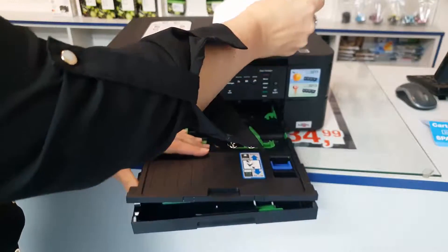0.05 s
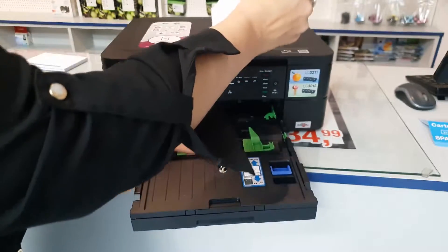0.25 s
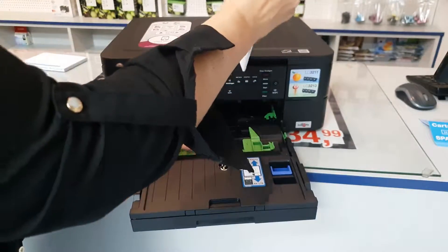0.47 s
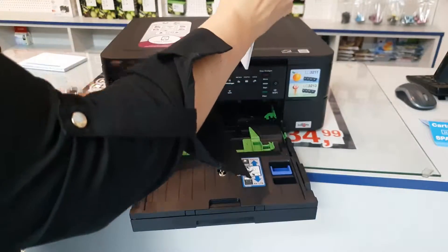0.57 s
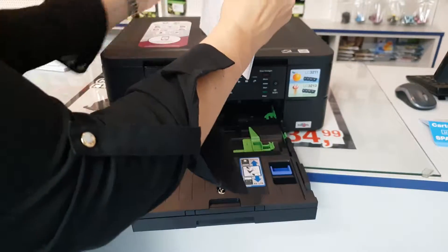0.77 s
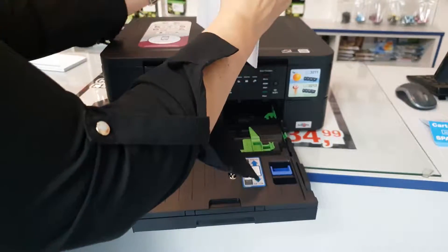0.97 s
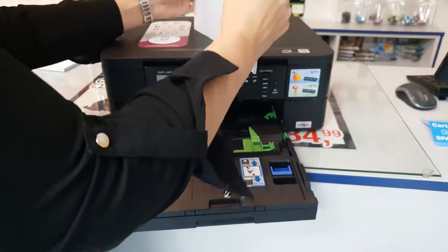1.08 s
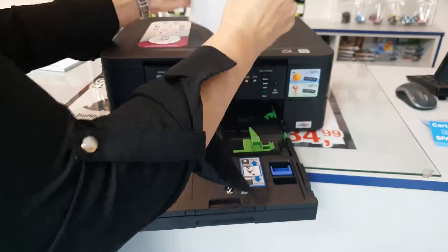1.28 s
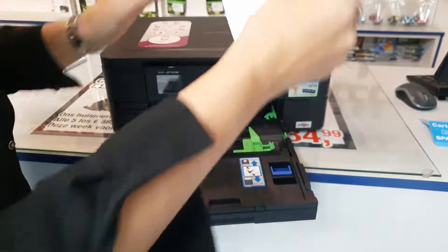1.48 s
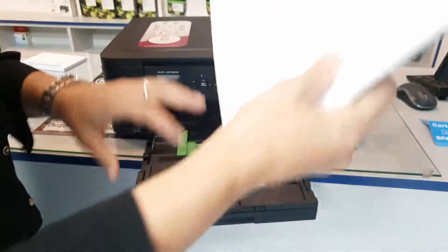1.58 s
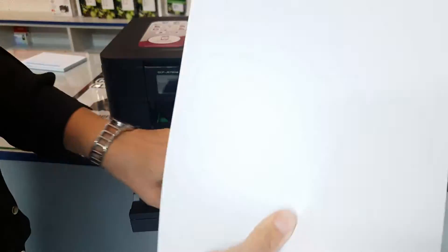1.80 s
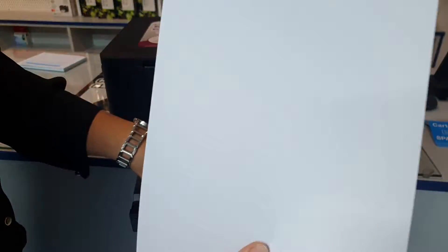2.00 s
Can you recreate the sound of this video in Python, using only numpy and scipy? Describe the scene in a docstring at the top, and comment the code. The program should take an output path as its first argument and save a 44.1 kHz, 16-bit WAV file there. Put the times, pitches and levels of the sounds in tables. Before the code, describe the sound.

A printer's plastic paper tray slides briefly, and its lid clacks shut sharply at about 0.25 seconds. Two hollow knocks on the housing follow near 0.8 and 1.1 seconds, the second louder, with small rattles and light paper crackling. A hand scuffs the casing around 1.4 seconds, and the sheet swishes softly from 1.3 to 1.9. The tray squeaks faintly near 2 seconds. Soft ventilation rumbles throughout.

```python
"""Over a shop's soft ventilation rumble, a printer's paper tray slides with a rush of friction, and its
plastic lid clacks shut in a cluster of impacts that excite its modes and shake the counter. Two hollow
knocks on the housing follow, with small rattles, while a sheet of paper crackles as it flexes. The
sheet swishes through the air, a hand scuffs the housing, and last the tray squeaks faintly by stick-slip."""
import sys
import numpy as np
from scipy import signal
from scipy.fft import rfft, irfft
from scipy.io import wavfile
from scipy.ndimage import uniform_filter1d

SR = 44100
rng = np.random.default_rng(int(sys.argv[2]) if len(sys.argv) > 2 else 0)


def to_wav(s):
    """Save 16-bit WAV."""
    ch = np.atleast_2d(s).T  # columns
    pcm = np.round(np.clip(ch, -1, 1) * 32767)  # PCM
    wavfile.write(sys.argv[1], SR, pcm.astype(np.int16))


N = 90404
TIME = np.arange(N) / SR
TAPS = 4096
HZ = abs(np.fft.fftfreq(TAPS, 1 / SR)) + 1  # frequency grid of the filters

# Levels in the tables are relative; spectra give the level per unit bandwidth.
# reverberation of the shop (frequency [Hz], T60 [s])
ROOM_DECAY = [(100, 0.72), (250, 0.48), (800, 0.33), (2000, 0.35), (4500, .4), (9000, 0.34), (15000, .3)]
ROOM_BUILD_S, ROOM_COHERENCE, MONO_BELOW_HZ = 0.013, 0.26, 560
# ventilation spectrum (frequency [Hz], level [dB])
VENT_SPECTRUM = [(20, -23.5), (38, -9.5), (62, 9), (85, 3), (115, 0.5), (160, -12), (260, -13), (400, -22),
                 (800, -31.5), (1600, -38.5), (4000, -27.5), (8000, -39.5), (15000, -37)]
# pushes of the tray (peak time [s], level [dB], rise [s], fall [s], bass edge [Hz])
SLIDE_STROKES = [(.0, -51, 0.044, 0.044, 119.2), (.165, -57.5, .03, .03, 1800),
                 (0.211, -42.5, 0.018, 0.013, 497)]
# friction spectrum of the runners (frequency [Hz], level [dB])
SLIDE_SPECTRUM = [(100, -15), (240, 14.5), (400, 1), (850, -0.5), (1500, -4), (4000, -1.5), (6500, -13.5),
                  (9000, -13), (15000, -22.5)]
SLIPS_PER_S, SLIP_SPREAD_DB, RUB_LAG_S = 9000, 3, 0.00036
# flexes of the sheet (peak time [s], level [dB], rise [s], fall [s], treble edge [Hz])
RUSTLE_STROKES = [(.15, -64, 0.031, 0.017, 11000), (.6, -66, 0.027, 0.026, 4600),
                  (0.767, -61, 0.0026, 0.03, 2600), (.77, -68.5, .005, 0.062, 11000),
                  (0.919, -54, 0.0067, 0.022, 16000), (.97, -80, 0.017, 0.082, 14000),
                  (1.19, -58, 0.136, 0.022, 14200), (1.35, -62.5, 0.034, 0.031, 16000),
                  (1.877, -64, .006, 0.022, 14000), (1.973, -63, 0.082, 0.052, 11000)]
# crackle spectrum of paper (frequency [Hz], level [dB])
RUSTLE_SPECTRUM = [(500, -18.5), (2300, -11), (4500, 1), (7000, -5), (9500, 1), (12000, -3.5), (15000, -3)]
# impacts of the lid on the tray (time [s], level [dB], tilt [dB/octave])
LID_IMPACTS = [(0.21, -24.5, 5), (0.223, -9, 2.5), (0.2266, -4.5, 2.5), (0.2376, -2, 0.5),
               (0.2403, -3.5, -1.5), (0.2451, -7, 3.5), (.2505, -8.5, -2.5), (0.2568, -9.5, -0.5),
               (0.2689, -18.5, 3), (.281, -15.5, 0), (.315, -21.5, -1.5)]
# spectrum of the tray's dense ring (frequency [Hz], level [dB])
TRAY_SPECTRUM = [(60, -32), (170, -21.5), (300, -8), (520, -2), (700, 1.5), (960, 3.5), (1400, 1.5),
                 (2400, 0), (4100, 0), (6000, -7.5), (9500, -10), (15000, -20.5)]
# distinct modes of the tray (frequency [Hz], level [dB])
TRAY_RESONANCES = [(195, -12), (246, -8), (492, -3), (547, 3), (861, 3), (921, 4), (964, 1), (1187, 0),
                   (1573, 0), (2228, -1), (2416, 3), (2960, 1), (3250, -1), (4154, -2), (4272, 0),
                   (4895, -5), (7648, -7)]
TRAY_DENSE_DB, TRAY_MODES_DB, TRAY_MODE_T60_S = 15.5, -44, 0.24
MODE_RISE_S, MODE_SPREAD_RAD_PER_HZ = 0.0012, 0.00061
# shudders of the counter (peak time [s], level [dB], rise [s], fall [s])
COUNTER_SHUDDERS = [(.275, -47.5, 0.0086, .06), (1.085, -47, 0.015, 0.081)]
# spectrum of the counter (frequency [Hz], level [dB])
COUNTER_SPECTRUM = [(25, -24.5), (60, -3), (90, -0.5), (150, 0), (220, -9.5), (500, -36), (2000, -72.5)]
# knocks and rattles (time [s], level [dB], treble edge [Hz], bass edge [Hz], mode level [dB])
HOUSING_IMPACTS = [(.7625, -5, 1850, 1900, -3), (.7675, -13, 1100, 220, -3), (.776, -11, 1250, 400, -12),
                   (.788, -13, 400, 200, -10), (.907, -9, 680, 620, -30), (1.061, -14, 5500, 1200, -25),
                   (1.0635, 4, 750, 380, 1), (1.068, -1, 14000, 240, -3), (1.0775, -1, 11000, 220, -1),
                   (1.092, -7, 1200, 200, -6), (1.122, -12, 3800, 250, -9), (1.143, -5, 2000, 650, -25),
                   (1.152, -4, 1800, 650, -25), (1.281, -17, 2600, 2600, -35), (1.4, -20, 1500, 900, -35),
                   (1.434, -27, 1400, 700, -35)]
# spectrum of the housing's dense ring (frequency [Hz], level [dB])
HOUSING_SPECTRUM = [(60, -8), (165, -15), (240, -2.5), (380, -8.5), (600, -6), (900, -7), (1700, -13),
                    (2800, -11), (5000, -19.5), (8000, -31), (15000, -28.5)]
# hollow modes of the housing (frequency [Hz], level [dB], T60 [s])
HOUSING_RESONANCES = [(196.8, -10.5, 0.37), (231, -7.5, 0.16), (245.1, 4, 0.25), (298.7, -8.5, 0.28),
                      (331.5, -23, 0.56), (462.7, -15, 0.453), (532, -20, 0.17), (580, -8.5, 0.098),
                      (599, -12.5, 0.21), (837, -9, 0.15), (1170, -6.5, 0.13), (1463, -15.5, 0.088),
                      (1585, -16.5, 0.17), (1761, -12, 0.19), (2093, -24, 0.053)]
HOUSING_DENSE_DB, HOUSING_MODES_DB, TREBLE_FLOOR_DB = 14.5, -32, -30
# swings of the sheet (peak time [s], level [dB], rise [s], fall [s])
SWISH_STROKES = [(1.29, -59.5, 0.065, 0.091), (1.64, -56.5, 0.079, 0.08), (1.79, -67.5, .04, .06),
                 (1.89, -68, 0.013, 0.13)]
# spectrum of the swinging sheet (frequency [Hz], level [dB])
SWISH_SPECTRUM = [(200, -7.5), (900, 2), (1400, -2.5), (2200, 1.5), (3300, 0), (5000, -4), (7000, -9),
                  (8700, -7.5), (12000, -15.5), (15000, -24)]
# strokes of a hand on the housing (peak time [s], level [dB], rise [s], fall [s])
SCUFF_STROKES = [(1.375, -50, 0.031, 0.047), (1.44, -60, 0.022, 0.054)]
# friction spectrum of the hand (frequency [Hz], level [dB])
SCUFF_SPECTRUM = [(120, -10), (420, 3), (850, 2), (1400, -4), (2500, -17.5), (6000, -45.5), (15000, -35)]
# squeaks of the tray (peak time [s], level [dB], rise and fall [s], pitch [Hz])
SQUEAK_TONES = [(1.963, -65, .02, 790), (2.018, -66, .018, 750), (2.015, -69, .014, 600)]
# harmonics of a squeak, from the fundamental up (level [dB])
SQUEAK_HARMONICS = [0, -20, -12]
SQUEAK_JITTER = 0.045  # RMS fraction of the pitch


def amp(db):
    """Amplitude ratio of a level in decibels."""
    return 10 ** (np.asarray(db) / 20)


def unit(x):
    """Normalisation to unit RMS."""
    return x / np.sqrt(np.mean(x ** 2) + 1e-20)


def curve(points, hz):
    """Interpolation on a log-frequency axis."""
    freqs, values = np.transpose(points)
    return np.interp(np.log(hz + 1), np.log(freqs + 1), values)


def add(mix, start_s, sound):
    """Superposition of a sound on the mix."""
    part = mix[:, round(start_s * SR):][:, :sound.shape[1]]
    part += sound[:, :part.shape[1]]


def rolloff_db(ratio, order):
    """Butterworth response: 3 dB down at a frequency ratio of 1, falling beyond it."""
    return -10 * np.log10(1 + ratio ** (2 * order))


def colour(x, gain_db):
    """Minimum-phase filtering, with the gain given on the grid HZ."""
    log_gain = np.log(amp(np.maximum(gain_db, -100)))
    taps = np.fft.ifft(np.exp(np.conj(signal.hilbert(log_gain)))).real
    return signal.fftconvolve(x, taps[None, :TAPS // 2], axes=1)[:, :x.shape[1]]


def stereo(x, coherence, lag_s=0):
    """Partial coherence: two independent noises blend into left and right, nearly mono in the bass."""
    hz = np.fft.rfftfreq(x.shape[1], 1 / SR)
    shared = np.clip(coherence + (1 - coherence) / (1 + (hz / MONO_BELOW_HZ) ** 3), 0, 1)
    mid, side = rfft(x) * np.sqrt([(1 + shared) / 2, (1 - shared) / 2])
    left = (mid + side) * np.exp(-2j * np.pi * hz * lag_s)
    return irfft(np.array([left, mid - side]), x.shape[1])


def room(x, wet_db):
    """Reverberation: a diffuse tail builds up and decays exponentially, the bass lasting longest."""
    noise = stereo(rng.standard_normal((2, SR)), ROOM_COHERENCE)
    hz, t, bands = signal.stft(noise, SR, nperseg=256)
    decay = 1000. ** (-t / curve(ROOM_DECAY, hz)[:, None])
    tail = signal.istft(bands * decay, SR, nperseg=256)[1][:, :SR]
    tail *= 1 - np.exp(-(TIME[:SR] / ROOM_BUILD_S) ** 2)
    return x + amp(wet_db) * signal.fftconvolve(x[:1], tail / np.linalg.norm(tail[0]), axes=1)[:, :N]


def swell(peak_s, db, rise_s, fall_s):
    """Envelope of a stroke: a Gaussian rise, then a nearly exponential decay."""
    t = TIME - peak_s
    rise = -(t / rise_s) ** 2 / 2
    fall = 1 - np.sqrt(1 + 2 * (t / fall_s) ** 2)
    return amp(db) * np.exp(np.where(t < 0, rise, fall))


def rub(strokes, spectrum):
    """Friction as shot noise: dense random slips, placed to one side by a delay on the right."""
    slips = rng.standard_normal((2, N))
    slips *= amp(SLIP_SPREAD_DB * np.minimum(rng.exponential(1, N), 4))
    slips *= rng.random(N) < SLIPS_PER_S / SR
    left, right = unit(colour(stereo(slips, coherence=0.27), curve(spectrum, HZ)))
    envelope = sum(swell(*stroke) for stroke in strokes)
    return np.array([left, np.roll(right, round(RUB_LAG_S * SR))]) * envelope


def ventilation():
    """Stationary noise: a low ventilation rumble with a faint hiss."""
    noise = stereo(rng.standard_normal((2, N + TAPS)), coherence=0.15)
    air = colour(noise, curve(VENT_SPECTRUM, HZ))
    return amp(-56.5) * unit(air[:, TAPS:])


def tray_slides():
    """Sliding friction: the tray drags on its runners, first with a low boom, then a thinner rush."""
    return sum(rub([stroke], [(hz, db + rolloff_db(bass_hz / hz, 3)) for hz, db in SLIDE_SPECTRUM])
               for *stroke, bass_hz in SLIDE_STROKES)


def paper_rustles():
    """Impulsive noise: each flex of the sheet crackles up to its own treble edge."""
    return sum(rub([stroke], [(hz, db + rolloff_db(hz / treble_hz, 4)) for hz, db in RUSTLE_SPECTRUM])
               for *stroke, treble_hz in RUSTLE_STROKES)


def resonance_db(modes, peak_db, width_hz):
    """Resonance: a Lorentzian bump in level at each mode, of half-width width_hz."""
    return peak_db * np.max([1 / (1 + ((HZ - mode[0]) / width_hz) ** 2) for mode in modes], axis=0)


def dense_ring(t60_s, coherence, lag_s=0):
    """Modal overlap: the crowded modes of struck plastic merge into decaying noise of unit energy."""
    t = TIME[:SR // 4]
    burst = stereo(rng.standard_normal((2, len(t))), coherence, lag_s) * 1000. ** (-t / t60_s)
    return burst / np.linalg.norm(burst[0])


def modal_ring(modes, start_s, gain_db):
    """Free vibration: damped sinusoids, the higher ones less in phase between left and right."""
    t, out = TIME[:SR], np.zeros((2, SR))
    for (hz, db, t60_s), scatter in zip(modes, rng.standard_normal((len(modes), 2, 1))):
        wave = np.sin(2 * np.pi * hz * (t + start_s) + scatter * hz * MODE_SPREAD_RAD_PER_HZ)
        drive_db = np.interp(hz, HZ[:TAPS // 2], gain_db[:TAPS // 2])
        out += amp(db + drive_db) * 1000. ** (-t / t60_s) * wave
    return out * (1 - np.exp(-(t / MODE_RISE_S) ** 2))


def lid_clacks():
    """Impact excitation: the lid touches, catches and lands, each blow setting the tray ringing."""
    cracks, rings = np.zeros((2, 2, N))
    modes = [(hz, db, TRAY_MODE_T60_S) for hz, db in TRAY_RESONANCES]
    body_db = curve(TRAY_SPECTRUM, HZ) + resonance_db(modes, peak_db=7, width_hz=16)
    for start_s, db, tilt in LID_IMPACTS:
        blow_db = db + tilt * np.log2(np.maximum(HZ, 250) / 2000)
        burst = dense_ring(t60_s=0.073, coherence=0.5, lag_s=0.00004)
        add(cracks, start_s, colour(burst, blow_db + body_db))
        add(rings, start_s, modal_ring(modes, start_s, blow_db))
    return amp(TRAY_DENSE_DB) * room(cracks, wet_db=-7.5) + amp(TRAY_MODES_DB) * rings


def counter_shudders():
    """Structure-borne sound: the counter answers the hardest blows with a low shudder."""
    rumble = unit(colour(rng.standard_normal((1, N)), curve(COUNTER_SPECTRUM, HZ)))
    return rumble * sum(swell(*shudder) for shudder in COUNTER_SHUDDERS)


def housing_knocks():
    """Resonance of a hollow case: soft blows excite little treble, light ones little bass."""
    thuds, rings = np.zeros((2, 2, N))
    body_db = curve(HOUSING_SPECTRUM, HZ) + resonance_db(HOUSING_RESONANCES, peak_db=9, width_hz=28)
    for start_s, db, treble_hz, bass_hz, modes_db in HOUSING_IMPACTS:
        soft_db = rolloff_db(HZ / treble_hz, 7)
        light_db = rolloff_db(bass_hz / HZ, 2)
        blow_db = db + np.maximum(soft_db, TREBLE_FLOOR_DB) + light_db
        burst = dense_ring(t60_s=0.075, coherence=0.57)
        add(thuds, start_s, colour(burst, blow_db + body_db))
        add(rings, start_s, modal_ring(HOUSING_RESONANCES, start_s, modes_db + (soft_db + light_db) / 2))
    return amp(HOUSING_DENSE_DB) * room(thuds, wet_db=-5) + amp(HOUSING_MODES_DB) * rings


def paper_swishes():
    """Broadband noise swells and fades as the sheet swings through the air."""
    return rub(SWISH_STROKES, SWISH_SPECTRUM)


def hand_scuffs():
    """Sliding friction: a hand brushes the housing with a dull rasp."""
    return rub(SCUFF_STROKES, SCUFF_SPECTRUM)


def tray_squeaks():
    """Stick-slip oscillation: under the hand the tray gives brief harmonic tones of unsteady pitch."""
    out = np.zeros(N)
    for peak_s, db, slope_s, hz in SQUEAK_TONES:
        wobble = unit(uniform_filter1d(rng.standard_normal(N), size=150))
        cycles = np.cumsum(hz * (1 + SQUEAK_JITTER * wobble)) / SR
        tone = sum(amp(level) * np.sin(2 * np.pi * k * cycles)
                   for k, level in enumerate(SQUEAK_HARMONICS, 1))
        out += unit(tone) * swell(peak_s, db, slope_s, slope_s)
    return out


def scene():
    """Superposition of the impacts, the reverberant handling noises and the ventilation."""
    handling = tray_slides() + hand_scuffs() + paper_swishes() + paper_rustles() + tray_squeaks()
    impacts = lid_clacks() + housing_knocks() + counter_shudders()
    return impacts + room(handling, wet_db=-6) + ventilation()


def record(dry):
    """Band limiting: a linear-phase low-pass removes the highest treble."""
    lowpass = signal.firwin(255, cutoff=15600, window=("kaiser", 9), fs=SR)
    return signal.oaconvolve(dry, lowpass[None], "same")


dry = scene()
out = record(dry)
to_wav(out)
```